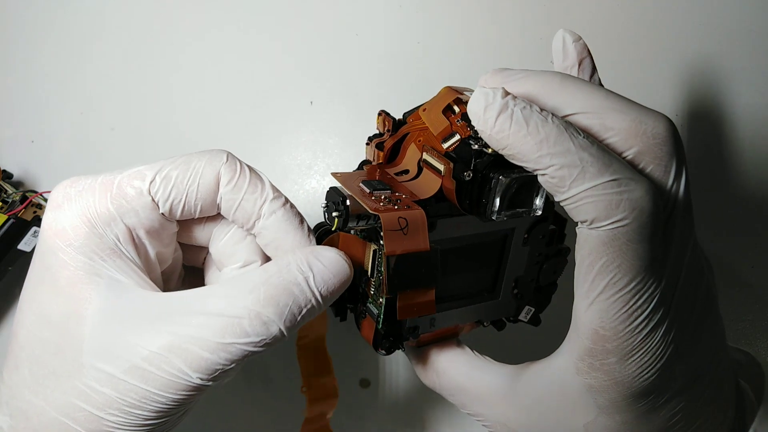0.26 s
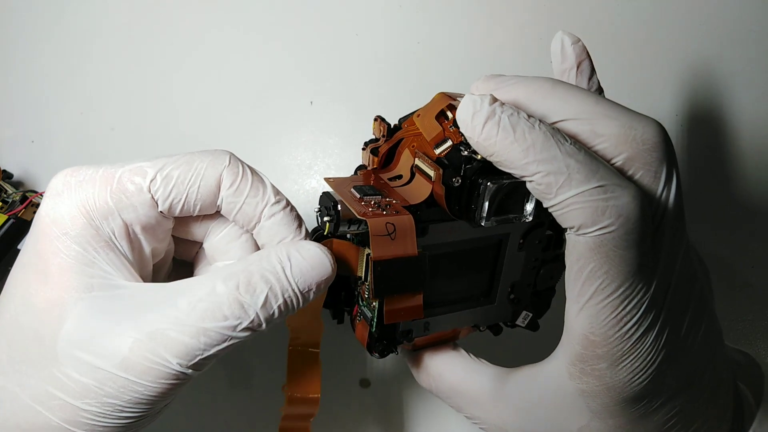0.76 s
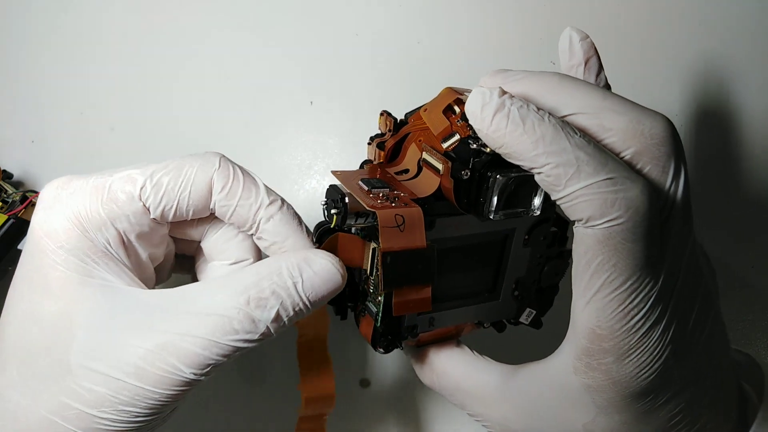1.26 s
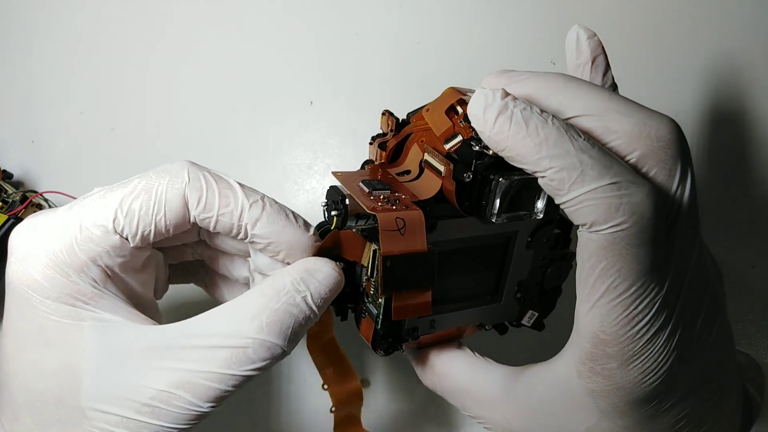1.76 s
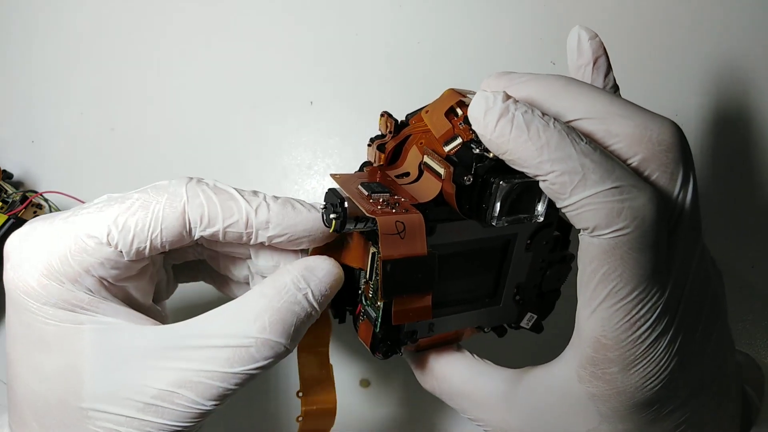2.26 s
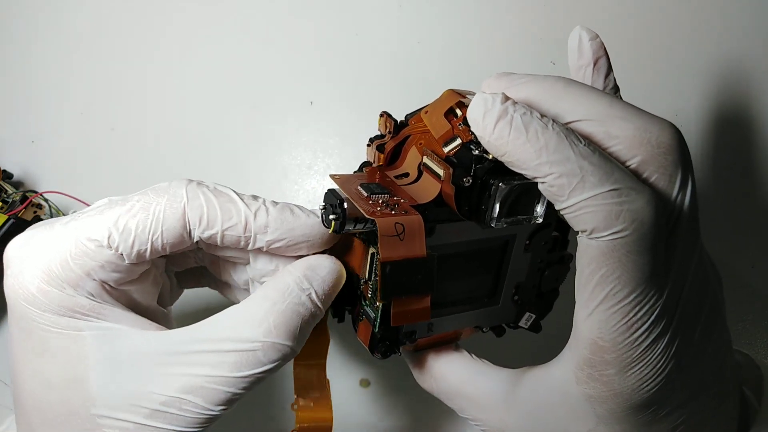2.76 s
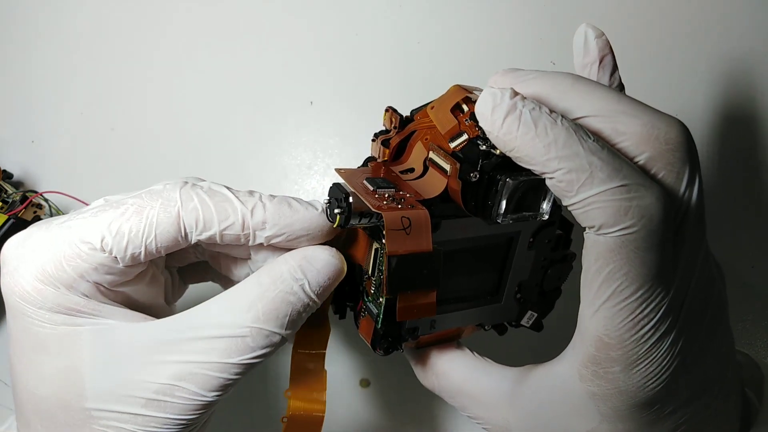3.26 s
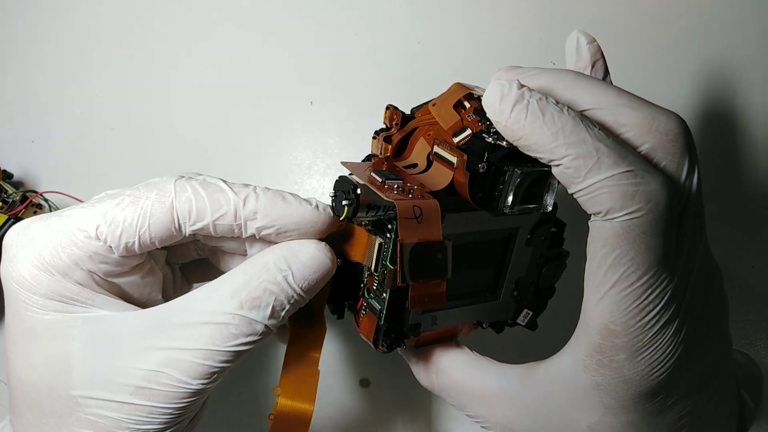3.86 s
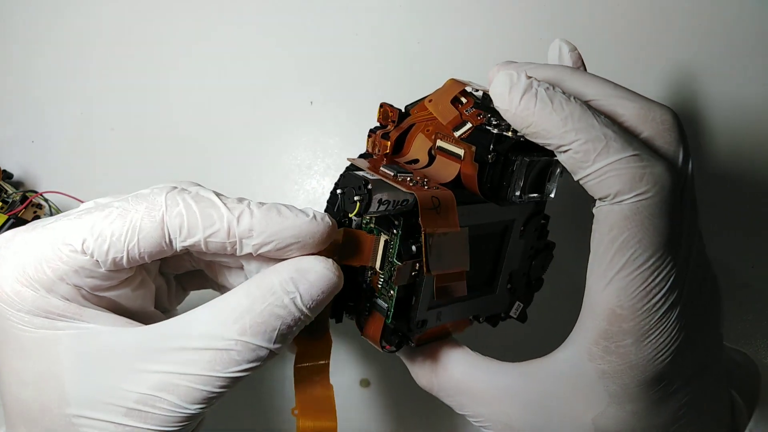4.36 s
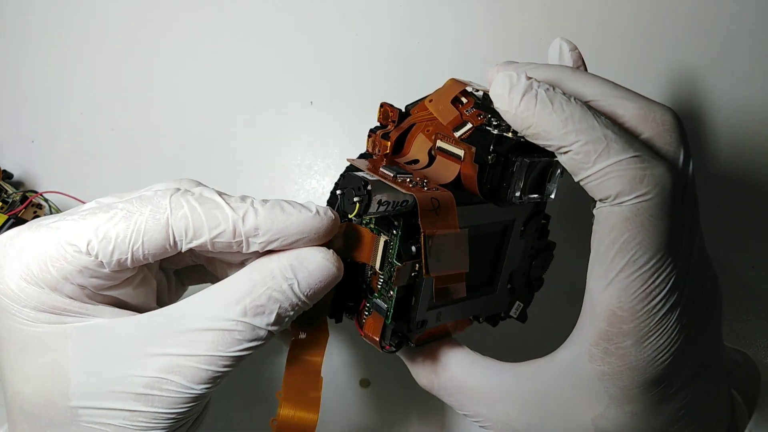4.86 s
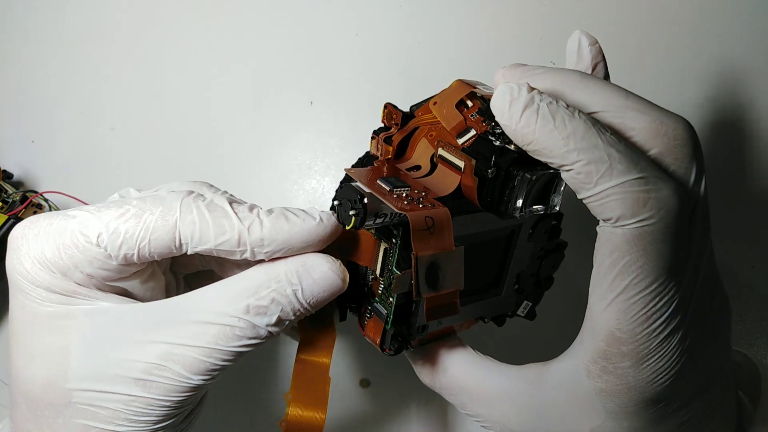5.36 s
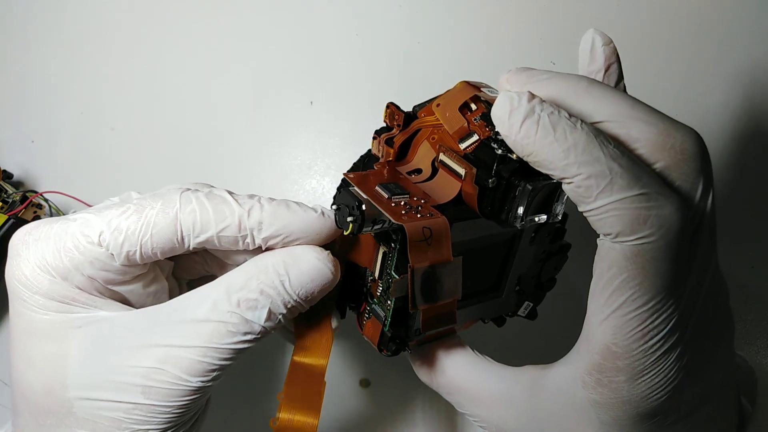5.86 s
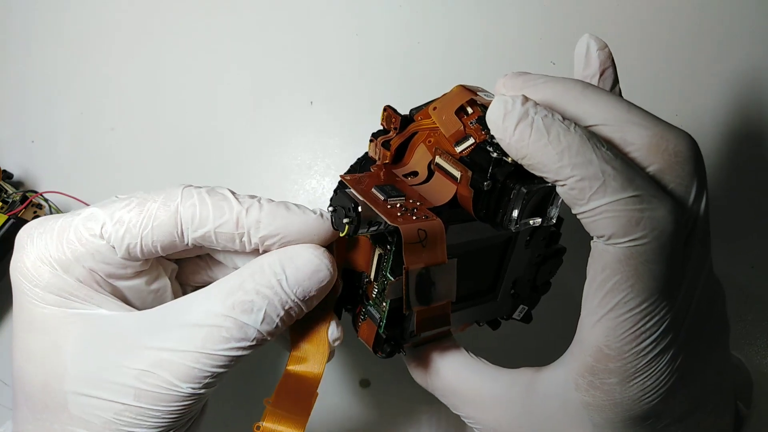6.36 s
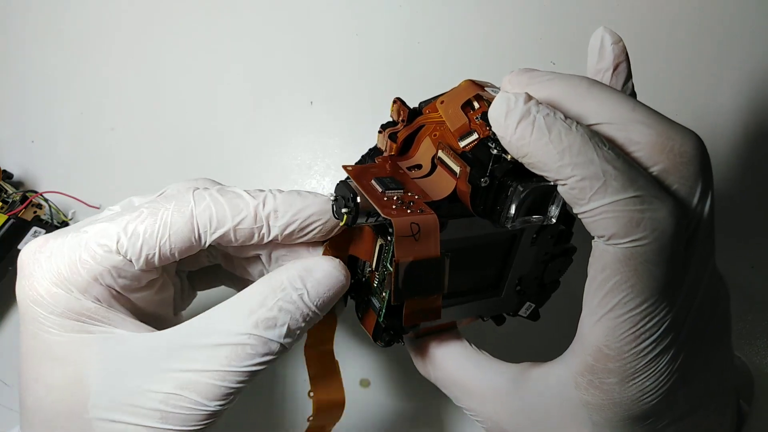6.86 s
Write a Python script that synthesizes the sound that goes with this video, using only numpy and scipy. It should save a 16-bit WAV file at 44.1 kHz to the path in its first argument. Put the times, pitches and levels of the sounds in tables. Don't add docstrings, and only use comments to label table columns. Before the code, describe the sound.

Close handling of small parts: crisp irregular snaps, faint ticks, brief glove rubs and tiny high motor steps above a soft indoor hum.

```python
import sys
import numpy as np
from scipy import signal
from scipy.fft import rfft, irfft
from scipy.io import wavfile
from scipy.ndimage import uniform_filter1d

SR = 44100
rng = np.random.default_rng(int(sys.argv[2]) if len(sys.argv) > 2 else 0)


def to_linear_factor(level_db):
    exponent = np.asarray(level_db, float) / 20
    return 10 ** exponent


def pcm_store(signal):
    levels = np.round(np.clip(np.atleast_2d(signal), -1, 1) * 32767)
    wavfile.write(sys.argv[1], SR, levels.astype(np.int16).T)


N = 313551


def evened(x):
    return x / np.sqrt(np.mean(x ** 2, -1, keepdims=True) + 1e-20)


def read(points, hz):
    f, value = np.transpose(points)
    return np.interp(np.log(hz + 1), np.log(f + 1), value)


def coloured(x, points):
    gain_db = read(points, np.fft.rfftfreq(x.shape[-1], 1 / SR))
    return irfft(rfft(x) * to_linear_factor(gain_db), x.shape[-1])


def add(mix, s, sound):
    part = mix[round(s * SR):][:len(sound)]
    part += sound[:len(part)]


def resonate(x, hz, width):
    b, a = signal.iirpeak(hz, hz / width, SR)
    return signal.lfilter(b, a, signal.lfilter(b, a, x))


def ring(modes, scale, chance, damping, grip=1):
    hz, db, t60 = np.transpose(modes)[:, :, None]
    t = np.arange(600) / SR
    hz = np.minimum(hz * scale * (1 + 0.0075 * chance[0]), SR * .4)
    side_db = db / min(grip, 1) ** .9
    level = to_linear_factor(side_db + 5.0 * chance[1] - 60 * damping * t / t60)
    x = (level * np.sin(2 * np.pi * hz * t) * np.sign(chance[0])).sum(0)
    x = x * (1 - np.exp(-t / 0.00022)) ** 2
    return x / abs(x).max()


# f/Hz, spectral level/dB
HISS = [(15, -49), (25, -26), (86, -2), (151, -2), (330, -37), (409, -29), (1650, -41.5), (1890, -41),
        (4120, -44.5), (13400, -46.5), (15400, -45.5)]


def hiss():
    flat = np.array([(hz, min(db, -34)) for hz, db in HISS])
    return evened(coloured(rng.standard_normal((2, N)), flat)) * to_linear_factor(-63)


# f/Hz, width/Hz, level/dB
LOW_MODES = [(86.3, 8.6, -0.5), (109.5, 9.3, 0.5), (138.87, 13, -6), (64.7, 25, -13)]
UPPER_MODES = [(173, 14, 0), (203, 14, -3)]
TOP_MODES = [(239, 27, 1), (285, 11, -2.5), (352, 6.3, -19.5)]
MODES_DB = [0, -8, -17]
# t/s, level/dB
LOAD = [
    (0, -64.5),
    (1.5, -63),
    (2.1, -60),
    (3.0, -63.5),
    (3.3, -60),
    (4.4, -63),
    (4.55, -65),
    (5.8, -68),
    (7.11, -65),
]
# middle t/s, length/s, low-mode level/dB, tilt per step up the modes/dB
SURGES = [(0.01, .06, -45.5, -11.5), (0.243, 0.34, -70.5, -2), (0.49, 0.076, -60.5, -9),
          (0.762, 0.15, -61, -5.5), (0.953, 0.25, -55.5, -16), (1.17, 0.15, -57, -12.5),
          (1.395, .1, -57, -34), (1.613, 0.24, -55.5, -11.5), (2.383, 0.11, -72.5, 9),
          (3.598, 0.35, -54.5, -3), (4.012, .24, -62.5, -27.5), (4.429, 0.18, -67.5, -3),
          (4.844, 0.084, -61.5, -20), (5.641, 0.087, -74, -0.5), (6.387, .13, -60.5, -10.5),
          (6.52, 0.083, -81, -4), (6.832, 0.21, -69, -8.5)]
# start t/s, end t/s, f/Hz, level/dB
DRONES = [
    (1.6, 3.7, 111, -61),
    (0.094, 0.454, 175, -61.5),
    (3.46, 3.68, 290, -60.5),
    (2.1, 2.78, 1155, -77),
    (2.345, 2.41, 385, -63.5),
]
RUMBLE_PAN_DB = [-1, 1]


def rumble():
    t = np.arange(N) / SR
    shared, own = rng.standard_normal(N), rng.standard_normal((2, N))
    same = .7
    drive = np.sqrt(same) * shared + np.sqrt(1 - same) * own
    out = np.zeros((2, N))
    for step, modes in enumerate([LOW_MODES, UPPER_MODES, TOP_MODES]):
        hum = evened(sum(to_linear_factor(db) * resonate(drive, hz, width) for hz, width, db in modes))
        level = to_linear_factor(np.interp(t, *np.transpose(LOAD)) + MODES_DB[step])
        for s, length, db, tilt_db in SURGES:
            cut = max(round((length / 2 - s) * SR), 0)
            swell = np.hanning(round(length * SR))[cut:]
            add(level, max(s - length / 2, 0), to_linear_factor(db + step * tilt_db) * swell)
        out = out + hum * level
    for start, end, hz, db in DRONES:
        span = np.arange(start, end, 1 / SR)
        for row, lag in zip(out, [0, .6]):
            tone = np.sin(2 * np.pi * hz * span - lag)
            add(row, start, to_linear_factor(db) * tone * signal.windows.tukey(len(span), .3))
    slow = uniform_filter1d(uniform_filter1d(rng.standard_normal(N), 1500), 1500)
    throb_db = 1.6 * evened(slow) - .5
    out = coloured(out * to_linear_factor(throb_db), [(420, 0), (500, -29.0)])
    return out * to_linear_factor(np.array(RUMBLE_PAN_DB))[:, None]


# start t/s, end t/s, level/dB, first step f/Hz, last step f/Hz
RUNS = [
    (0.429, .51, -62.5, 11320, 11350),
    (0.583, 0.628, -65, 12200, 12430),
    (.835, 0.883, -60, 10900, 10500),
    (4.834, 4.95, -74, 11990, 10920),
    (6.482, 6.702, -64.5, 12270, 11600),
    (6.748, 6.798, -67.5, 11690, 11900),
    (6.918, 7.086, -62.5, 11200, 10480),
]
# t/s, level/dB, f/Hz
STEPS = [(3.3845, -65.5, 11900), (3.4157, -62, 11780), (3.4481, -76, 11800), (3.4848, -75, 10400),
         (3.519, -65.5, 12250), (3.5494, -69, 11280), (3.5847, -64, 11500), (3.6172, -66.5, 11400),
         (3.684, -75, 11900), (3.7016, -74.5, 11930), (3.742, -69.5, 12000), (3.8157, -71.5, 12000),
         (3.8497, -81, 11200), (3.8811, -83.5, 11470)]
# start t/s, end t/s, f/Hz, level/dB
SING = (4.73, 5.1, 10120, -80)


def whine():
    out, t = np.zeros(N), np.arange(1500) / SR
    step_s = .0335
    for (first, last, db, first_hz, last_hz), luck in zip(RUNS, rng.standard_normal((len(RUNS), 12, 2))):
        for s, (louder, higher) in zip(np.arange(first, last, step_s), luck):
            hz = np.interp(s, [first, last], [first_hz, last_hz]) * (1 + .014 * higher)
            tick = np.sin(2 * np.pi * hz * t) * (1 - np.exp(-t / 0.00048))
            add(out, s, to_linear_factor(db + 3 * louder + 6.0 - 60 * t / 0.021) * tick)
    for s, db, hz in STEPS:
        tick = np.sin(2 * np.pi * hz * t) * (1 - np.exp(-t / 0.00043))
        add(out, s, to_linear_factor(db + 8.5 - 60 * t / 0.025) * tick)
    start, end, hz, db = SING
    t = np.arange(start, end, 1 / SR)
    line = evened(resonate(rng.standard_normal(len(t)), hz, 27.0))
    add(out, start, to_linear_factor(db) * line * signal.windows.tukey(len(t), .2))
    return out * to_linear_factor(np.array([[-25.], [0.]]))


# f/Hz, t60/s
ROOM_T60 = [(600, 0.41), (1500, 0.4), (3500, 0.21), (6000, 0.17), (9000, 0.27), (14000, 0.062)]
# f/Hz, level/dB
ROOM_COLOUR = [(600, -4), (2000, -2), (5000, -1.5), (8000, -1), (13000, -1)]
ROOM_DB = [-11, -10.5]
# t/s, level/dB
ECHOES = [(.0022, -21), (.0037, -24), (.0062, -27), (.0085, -26), (0.0127, -28)]
# f/Hz, level/dB
ROOM_NOTCHES = [(2500, 1), (2950, -6.5), (3350, -0.5), (4700, 1), (5200, -2.5), (5700, 0.5), (8300, -3.5),
                (8900, 0)]


def room(x):
    taps = np.zeros((2, SR // 2))
    grid = np.arange(60, SR // 2 - 12, 12)
    at = grid + rng.integers(0, 12, (2, len(grid)))
    np.put_along_axis(taps, at, rng.choice([-1., 1.], at.shape), 1)
    hz, t, z = signal.stft(taps, SR, nperseg=128)
    decay_db = read(ROOM_COLOUR, hz)[:, None] - 60 * t / read(ROOM_T60, hz)[:, None]
    tail = signal.istft(z * to_linear_factor(decay_db), SR, nperseg=128)[1]
    tail *= to_linear_factor(np.array(ROOM_DB))[:, None] / np.linalg.norm(tail, axis=1, keepdims=True)
    n = tail.shape[1]
    early = to_linear_factor(-18 - 60 * np.arange(n) / SR / 0.042)
    tail += early * np.pad(taps, [(0, 0), (0, 999)])[:, :n] / 3
    for s, db in ECHOES:
        delay = np.round(s * SR * rng.uniform(.9, 1.1, 2)).astype(int)
        tail[[0, 1], delay] += to_linear_factor(db) * rng.choice([-1, 1], 2)
    out = coloured(signal.oaconvolve(x[None], tail, axes=1)[:, :N], ROOM_NOTCHES)
    out[0] = coloured(out[0], [(6000, 0), (12000, -8.5)])
    return out


# t/s, level/dB
RUSTLES = [
    [(1.6, -77), (1.617, -66.5), (1.635, -56.5), (1.643, -52.5), (1.68, -68), (1.74, -67.5)],
    [(1.9, -69.5), (1.906, -52.5), (1.922, -48.5), (1.927, -29.5)],
    [(4.125, -88), (4.131, -70), (4.159, -75.5), (4.17, -90)],
]
# f/Hz, level/dB
RUSTLE_COLOUR = [(880, -64.5), (1500, -35.5), (3500, -17), (4540, -8.5), (5300, -11.5), (7500, -3.5),
                 (13400, -14.5), (15000, -33.5)]
# f/Hz, width/Hz, level/dB
RUSTLE_MODES = [(3200, 500, -14), (4500, 460, -7), (6200, 690, -2.5), (7700, 900, .5), (9300, 600, -4),
                (10500, 800, -3), (11700, 400, -8), (13200, 900, -6.5)]


def rustle(grains_per_s=14000, spread_db=1.6):
    out = np.zeros(N)
    for rows in RUSTLES:
        s, level_db = np.transpose(rows)
        t = np.arange(s[0], s[-1], 1 / SR)
        slips = rng.standard_normal(len(t)) * (rng.random(len(t)) < grains_per_s / SR)
        slips = evened(coloured(slips * to_linear_factor(spread_db * rng.exponential(1, len(t))), RUSTLE_COLOUR))
        rings = sum(to_linear_factor(db) * evened(resonate(slips, hz, width)) for hz, width, db in RUSTLE_MODES)
        slips = evened(slips + to_linear_factor(-3.5) * evened(rings))
        add(out, s[0], slips * to_linear_factor(np.interp(t, s, level_db) + 2.5) * signal.windows.tukey(len(t), .2))
    return out


# t/s, level/dB, f/Hz
TOUCHES = [(0.257, -57, 2020), (.701, -63, 10710), (.742, -39.5, 1680), (.925, -56, 990),
           (1.003, -62, 10100), (1.005, -62, 4500), (1.07, -61, 7770), (1.0848, -44, 13900),
           (1.087, -56.5, 2470), (1.627, -58, 2830), (1.63, -59, 3700), (1.716, -58, 3570),
           (1.742, -50.5, 1700), (1.906, -54, 1300), (2.0464, -45, 14300), (1.9, -56, 1606),
           (2.502, -56, 1160), (2.52, -60.5, 622), (2.708, -58.5, 2210), (2.709, -65, 1160),
           (3.045, -58, 3590), (3.046, -58, 4600), (3.909, -64, 4400), (3.938, -58, 8500),
           (3.939, -63, 1230), (3.977, -59.5, 2500), (4.018, -65, 9800), (4.068, -62.5, 7600),
           (3.7, -61.5, 11200), (4.158, -62.5, 9300), (4.281, -52, 1365), (4.697, -54.5, 1689),
           (4.7, -60, 4330), (5.152, -58.5, 4050), (5.1512, -59, 12600), (5.1514, -65, 11500),
           (5.152, -59.5, 6570), (5.152, -59, 9200), (5.1524, -63, 4760), (5.225, -58, 4580),
           (5.224, -63, 9400), (5.238, -54, 4640), (5.2374, -63, 3530), (5.2396, -61, 7700),
           (5.251, -67, 3420), (5.276, -66, 3420), (5.297, -59, 4420), (5.2975, -64, 12300),
           (5.336, -60, 3530), (5.471, -58.5, 13540), (5.472, -61.5, 4700), (6.776, -61, 5694),
           (6.777, -59.5, 2450), (6.88, -55, 3970), (6.883, -59, 4600), (6.8825, -52.5, 6200),
           (6.883, -54.5, 3430)]


def touches():
    out, t = np.zeros(N), np.arange(2500) / SR
    for s, db, hz in TOUCHES:
        level = to_linear_factor(db + 1.5 - 60 * t / .018)
        add(out, s, level * np.sin(2 * np.pi * hz * t) * (1 - np.exp(-t / 0.00065)))
        add(out, s, to_linear_factor([db + 9]))
    return out


# t/s, low mode level/dB, low mode f/Hz, high mode level/dB, high mode f/Hz
KNOCKS = [(0.259, -103, 1130, -81, 2040), (0.738, -57, 1236, -53.5, 2270), (0.924, -71.5, 910, -74.5, 1640),
          (1.742, -73, 659, -60, 2350), (1.93, -56, 690, -51, 2290), (2.045, -64.5, 1210, -53.5, 2460),
          (2.345, -94.5, 1430, -65.5, 1976), (2.52, -56, 1152, -55.5, 2290), (2.637, -62, 1198, -73, 2440),
          (2.673, -74.5, 1150, -72, 2137), (2.731, -71.5, 1140, -57, 2510), (3.043, -72, 862, -69.5, 2450),
          (4.145, -84.5, 586, -67.5, 2250), (4.327, -61.5, 1006, -52, 1750), (4.38, -62, 1106, -54, 2044),
          (4.697, -82, 1188, -78, 1685), (5.224, -67, 1166, -70, 2160), (5.238, -84, 1132, -77, 2190),
          (5.295, -69.5, 1107, -72, 2140), (5.334, -78, 1092, -72.5, 2200), (6.328, -65.5, 1110, -52, 2120)]
# f/Hz, level/dB
THUD_COLOUR = [(400, -31), (650, -5), (1500, -1.5), (2600, 4.5), (3500, -23.5)]


def knocks():
    out, t = np.zeros(N), np.arange(2500) / SR
    puffs = evened(coloured(rng.standard_normal((len(KNOCKS), len(t))), THUD_COLOUR))
    for (s, low_db, low_hz, high_db, high_hz), puff in zip(KNOCKS, puffs):
        peak_db = max(low_db, high_db)
        grip = np.interp(peak_db, [-55.4, -51], [1, 3.5])
        low = np.sin(2 * np.pi * low_hz * t) * (1 - np.exp(-grip * t / .0025))
        low = to_linear_factor(low_db - 60 * grip * t / .05) * low
        high = np.sin(2 * np.pi * high_hz * t) + .6 * np.sin(2 * np.pi * 1.13 * high_hz * t)
        high = to_linear_factor(high_db - 60 * grip * t / .02) * high
        thud = (grip - 1) * to_linear_factor(peak_db + 13 - 60 * t / .012) * puff
        modes = to_linear_factor(8.3 * np.log(grip) + 15.0) * (low + high)
        add(out, s, (modes + thud) * (1 - np.exp(-t / 0.00083)))
    return out


# ratio to the pitch, level/dB, t60/s
BRIGHT = [(1.0, 3, 0.0039), (.9, -3, .004), (1.1, -4, 0.0062), (0.81, -10.5, 0.0044)]
# t/s, level/dB, f/Hz
PINGS = [(1.0143, -52.5, 3730), (1.0363, -55, 7770), (1.0858, -47, 11700), (1.2452, -50, 6440),
         (2.6244, -46.5, 11700), (3.8991, -52, 5750), (4.1322, -47, 7380), (4.212, -60, 7600),
         (4.38, -17, 11450), (6.895, -66, 8350), (7.0791, -52.5, 5500), (6.3293, -14.5, 12650),
         (2.7293, -25.5, 8440), (7.082, -56, 7000)]


def pings():
    out = np.zeros((2, N))
    for (s, db, hz), luck in zip(PINGS, rng.uniform(-1, 1, (len(PINGS), 2, 4, 1))):
        grip = np.interp(db, [-46, -16], [.46, 1.5])
        add(out[0], s, to_linear_factor(db) * ring(BRIGHT, hz, luck, grip, grip))
        add(out[1], s, to_linear_factor(db) * ring(BRIGHT, hz, luck, 1.9 * grip, grip))
    return out


# t/s, bright level/dB, bright f/Hz, body level/dB, body f/Hz
SNAPS = [(0.7404, -19, 7200, -15, 3760), (0.768, -44, 6240, -32, 3380), (0.7864, -30, 5520, -42, 4170),
         (1.0854, -28, 6600, -36, 3800), (1.7427, -25, 5520, -35, 3300), (1.906, -45, 8500, -38, 3340),
         (1.93, -9, 7000, -8, 3960), (2.0464, -24, 6990, -23, 3780), (2.0723, -29.5, 5670, -34, 4400),
         (2.3448, -33, 7120, -39.5, 3690), (2.5202, -15, 6760, -49, 3810), (2.5297, -29, 5600, -39, 3290),
         (2.541, -27.5, 5700, -32, 4150), (2.637, -36, 6670, -41, 3630), (2.673, -37, 7570, -42.5, 3970),
         (2.7302, -28, 6000, -25, 4490), (4.281, -19.5, 6750, -21.5, 4320), (4.32, -20.5, 6270, -20, 4400),
         (4.328, -21.5, 7300, -15.5, 3640), (4.3412, -35, 6170, -53, 4400), (4.35, -40, 5580, -29, 4180),
         (4.381, -16.5, 6830, -21, 3810), (6.33, -4.5, 6270, -8.5, 3950), (6.882, -34.5, 7860, -47, 3430)]
# t/s, bright level/dB, bright f/Hz, body level/dB,
# body f/Hz
MORE_SNAPS = [(0.7535, -41, 7080, -42, 3660), (0.926, -44, 7600, -46.5, 4280), (2.207, -45, 6850, -52.5, 4130),
              (2.535, -25.5, 5800, -55, 3285), (2.55, -36, 5800, -36, 4340), (2.708, -46, 8160, -52, 3960),
              (2.7908, -57.5, 6330, -56.5, 3490), (3.0439, -43, 7330, -52, 4203),
              (3.703, -48.5, 6800, -44.5, 3530), (3.7418, -42, 6570, -47, 4010), (3.9084, -48, 6960, -56, 3530),
              (3.9377, -45.5, 7270, -51, 3930), (3.977, -51, 6970, -49, 3790), (4.146, -45, 7700, -46.5, 4130),
              (4.1507, -43, 7400, -48.5, 4080), (4.1584, -42, 7050, -49.5, 4020),
              (5.225, -45.5, 7424, -43, 3475), (5.2374, -53, 6530, -49, 3450), (5.249, -67.5, 6560, -75, 3290),
              (5.2966, -51, 7400, -48, 3590), (5.336, -58.5, 8300, -59, 3350), (5.472, -49.5, 7820, -62, 4550)]
# ratio to the pitch, level/dB, t60/s
BODY = [(1.004, -1, 0.0051), (0.69, -1.5, 0.0013), (1.12, -5.5, 0.0038), (1.24, -13, 0.0043)]
# f/Hz, level/dB, t60/s
FIZZ = [(11200, -4.5, 0.0017), (12620, 0, 0.0019), (13980, -2.5, 0.0035), (9970, -12.5, 0.0043)]
REGISTER_DB = [-0.38, -1.03, -0.8]
# strongest ring level/dB, fizz level/dB
FIZZ_LAW = [(-66, -99), (-45.5, -74), (-33, -47), (-21, -29), (-6, -8.5)]
FIZZ_TRIM_DB = [1, -5.5, 4, 6.5, -3.5, 0.1, -2, -4, 4.5, -7, -3, 3, -2, 1.5, -1, 0, -4.5, -0.2, 3.5, -2, 2,
                -22, -0.3, -3]
# strongest ring level/dB, click level/dB
CONTACT_LAW = [(-55, 8), (-40, 4), (-25, -8), (-6, -11)]


def snaps():
    out = np.zeros((2, N))
    events = SNAPS + MORE_SNAPS
    trims_db = FIZZ_TRIM_DB + [0] * len(MORE_SNAPS)
    chance = rng.uniform(-1.2, 1, (len(events), 3, 2, 4, 1))
    for (s, bright_db, bright_hz, body_db, body_hz), luck, trim_db in zip(events, chance, trims_db):
        peak_db = max(bright_db, body_db)
        grip = np.interp(peak_db, [-45, -15], [.45, 1.1])
        click_db = peak_db + np.interp(peak_db, *np.transpose(CONTACT_LAW))
        add(out[0], s, to_linear_factor([click_db]))
        add(out[1], s, to_linear_factor([click_db - 6]))
        fizz_db = np.interp(peak_db, *np.transpose(FIZZ_LAW)) + trim_db
        toward_near = (out[0], grip, 0, 0)
        into_room = (out[1], grip * (1.5 + 2.2 * (grip - .45)), 4.5 * grip - 3.1, 0.28 * (grip - .45))
        for row, damping, gain_db, pull in [toward_near, into_room]:
            bright_hz, body_hz = (hz + pull * (5100 - hz) for hz in (bright_hz, body_hz))
            bright = ring(BRIGHT, bright_hz, luck[0], damping, grip)
            body = ring(BODY, body_hz, luck[1], damping, grip)
            fizz = ring(FIZZ, 0.93, luck[2], damping)
            add(row, s, to_linear_factor(bright_db + REGISTER_DB[0] + gain_db) * bright)
            add(row, s, -to_linear_factor(body_db + REGISTER_DB[1] + gain_db) * body)
            add(row, s, to_linear_factor(fizz_db + REGISTER_DB[2] + gain_db) * fizz)
    return out


# f/Hz, level/dB
SHADOW = [(500, -5), (2000, -17), (4000, -19), (6500, -11.5), (12500, -26.5)]


def scene():
    parts = coloured(snaps() + pings(), [(2000, -10.5), (3200, 0.5)])
    housing = coloured(knocks() + touches(), [(480, -14.5), (620, 1.0)])
    near, spread = parts + housing + rustle()
    lag_s = .00028
    far = np.roll(coloured(near, SHADOW), round(lag_s * SR))
    return np.array([far, near]) + room(spread) + rumble() + whine()


def roll_off(x):
    return signal.sosfilt(signal.butter(12, 15500, fs=SR, output="sos"), x)


def record(dry):
    depth_db, margin_db = 21, 4.3
    hold, release_db_per_s = .85, 223
    dry = coloured(dry, [(14200, 0.0), (14700, -13.5), (15400, -24), (16500, -50)])
    hz, t, z = signal.stft(np.array([dry, hiss()], np.float32), SR, nperseg=512, noverlap=384)
    bass = hz[:, None] < 560
    noise = (abs(z[1]) ** 2).mean(2, keepdims=True)
    z = z[0] + z[1] * np.where(bass, to_linear_factor(-depth_db), 1)
    power = uniform_filter1d(abs(z) ** 2, size=5, axis=1)
    power = signal.lfilter([1 - hold], [1, -hold], power)
    broad = np.exp(uniform_filter1d(np.log(abs(z) ** 2 + 1e-20), size=41, axis=1))
    power = np.maximum(power, 1.2 * broad)
    clear = 2.0 * (1 - noise * to_linear_factor(2 * margin_db) / power)
    gain_db = 20 * np.log10(np.clip(clear, to_linear_factor(-depth_db), 1))
    fall_db = release_db_per_s * t
    gain_db = np.maximum.accumulate(gain_db + fall_db, 2) - fall_db
    gated = z * np.where(bass, 1, to_linear_factor(gain_db))
    out = signal.istft(gated, SR, nperseg=512, noverlap=384)[1][:, :N].astype(float)
    return roll_off(out)


dry = scene()
out = record(dry)
pcm_store(out)
```